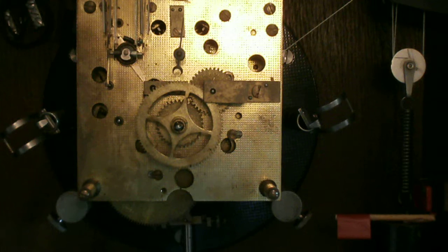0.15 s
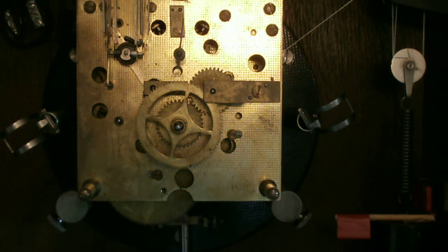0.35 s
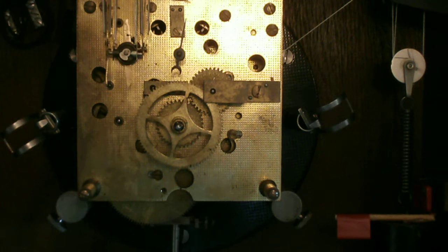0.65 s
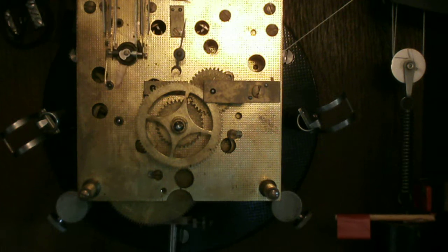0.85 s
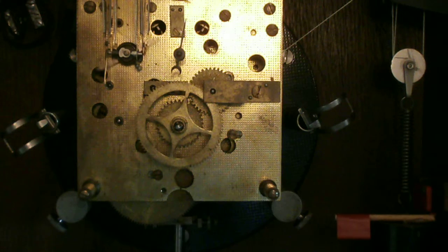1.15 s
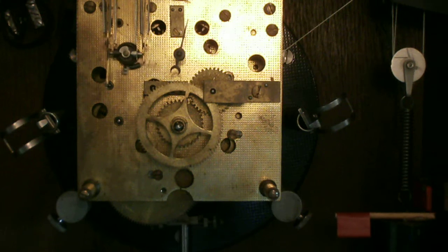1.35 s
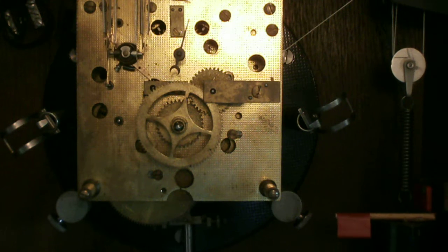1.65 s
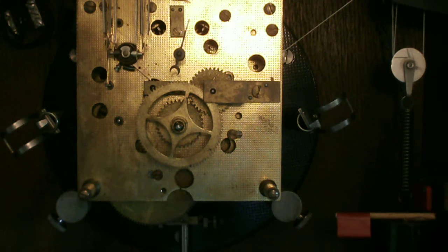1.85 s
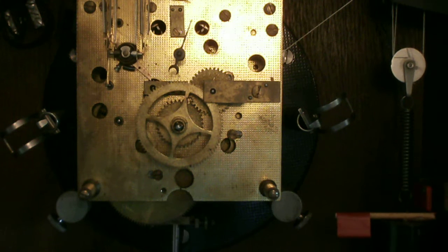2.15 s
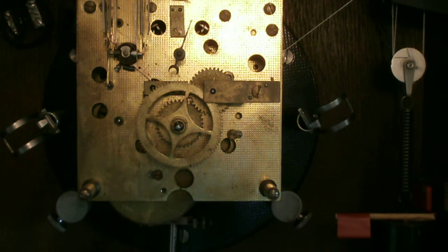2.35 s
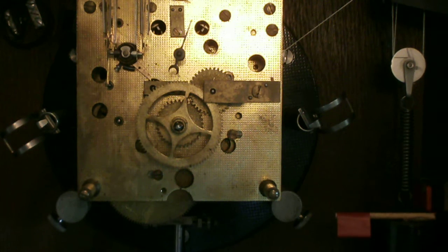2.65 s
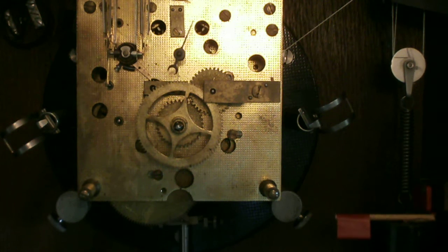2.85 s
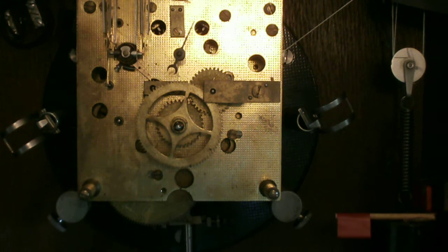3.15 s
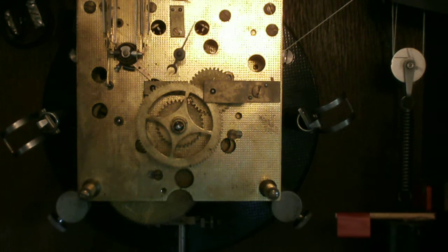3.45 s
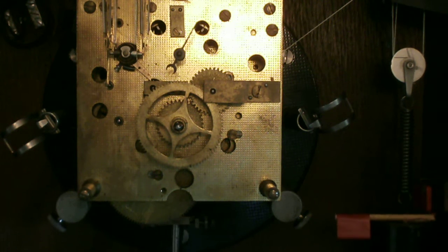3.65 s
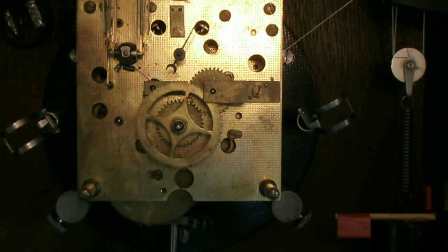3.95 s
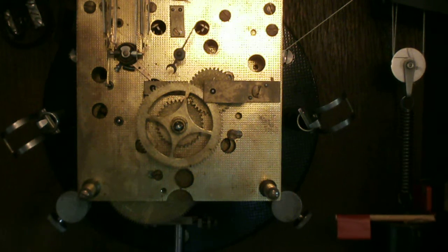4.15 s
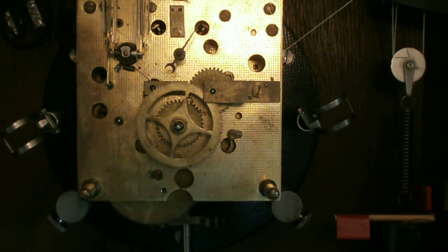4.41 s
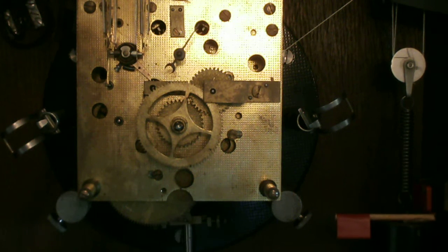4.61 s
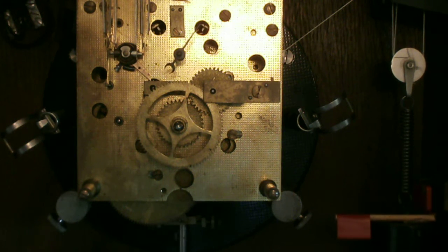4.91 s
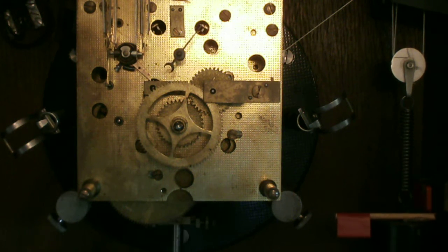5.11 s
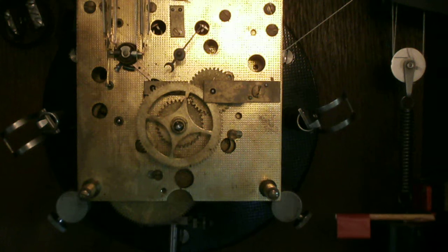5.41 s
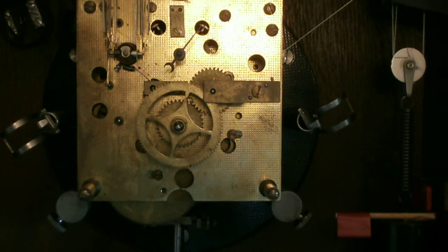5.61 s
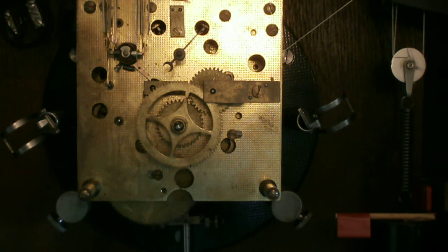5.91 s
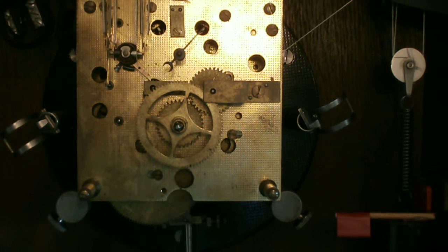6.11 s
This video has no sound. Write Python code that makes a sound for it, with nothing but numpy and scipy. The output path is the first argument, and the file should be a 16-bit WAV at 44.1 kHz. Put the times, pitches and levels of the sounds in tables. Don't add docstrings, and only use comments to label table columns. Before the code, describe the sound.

Quiet, dry pendulum clock beats alternate between a bright tick and a slightly fuller tock, with uneven gaps. At about one second a loud burst of metallic clacks and bounces breaks in, with a brief woody knock and short cabinet echo, then ends. The faint beats carry on steadily to the end. The close microphone adds soft rumble and hiss, with faint buzzy high-pitched screen noise.

```python
import sys
import numpy as np
from scipy import signal
from scipy.fft import rfft, irfft, next_fast_len
from scipy.io import wavfile
from scipy.ndimage import map_coordinates

SR = 44100
rng = np.random.default_rng(int(sys.argv[2]) if len(sys.argv) > 2 else 0)


def voltage_ratio(level):
    return 10 ** (np.asarray(level, float) / 20)


def int16_out(signal):
    q = np.round(np.clip(np.atleast_2d(signal).T, -1, 1) * 32767)
    wavfile.write(sys.argv[1], SR, q.astype(np.int16))


N = 276504


# pitch_hz, width_hz, level_db
TICK_NOTES = [(896, 170, -1), (1980, 190, -6.5), (2490, 250, -11.5), (3750, 130, -7.5), (4070, 160, -6),
              (5090, 140, -9), (5580, 170, -2.5), (6280, 80, -8), (6540, 80, -17), (7080, 110, -1),
              (8400, 86, -7), (9250, 120, -16), (10300, 150, -25)]
TOCK_NOTES = [(843, 190, -1), (1795, 44, 1.5), (1916, 65, 6.5), (3480, 105, -4), (3950, 130, -1.5),
              (4280, 130, -6), (4700, 120, -12), (5530, 89, 2.5), (5840, 71, -6), (6310, 120, -2),
              (6700, 88, -5), (2700, 390, -8), (8100, 180, -13), (9400, 180, -13)]
# pitch_hz, t60_s (time to fade by 60 dB), level_db (against the beat)
BACK_BOARD = [(963, .075, -9.5), (988, 0.084, -10)]


def escapement():
    first_tick_s, swing_s, tock_after_s = 0.5795, 1.5, 0.8151
    tick_db, tock_db, tooth_db = -30, -29, -9
    board_lag_s, board_rise_s = 0.0016, 0.0015
    out = np.zeros(N + SR)
    t = np.arange(SR // 4) / SR
    pallets = ((first_tick_s, tick_db, TICK_NOTES), (first_tick_s + tock_after_s, tock_db, TOCK_NOTES))
    for (first_s, beat_db, notes), (board_hz, t60_s, board_db) in zip(pallets, BACK_BOARD):
        voice = clack(notes, 0.0025, crack_db=-1.5, lag_s=0.002826, wet_db=-7.5)
        board = voltage_ratio(board_db - 60 * t / t60_s) * np.sin(2 * np.pi * board_hz * t)
        board = board * (1 - np.exp(-t / board_rise_s))
        for beat_s in np.arange(first_s, N / SR, swing_s):
            tooth = clack(notes, 0.0025, crack_db=8.5, lag_s=0.00195, wet_db=-7.5)
            add(out, beat_s - 0.0018, voltage_ratio(beat_db) * (voice + voltage_ratio(tooth_db) * tooth))
            add(out, beat_s + board_lag_s, voltage_ratio(beat_db) * echoes(board, wet_db=-6.5))
    return out[:N]


# start_s, peak_db, contact_s, case_knock_db
PULL_IN = [
    (1.0215, -7.5, 0.0027, -27.5),
    (1.0255, -22, 0.002, -47),
]
LEVER_FALL = [
    (1.214, -0.5, 0.0032, -12.5),
    (1.2203, -4, 0.0018, -27),
    (1.229, -29, 0.0016, -45),
    (1.252, -31, 0.0011, -32),
]
PAWL_DROP = [
    (1.3298, -4.5, 0.0025, -23),
    (1.339, -32, 0.00094, -31),
]
RELEASE = [
    (1.3533, -11, 0.0014, -19),
    (1.3572, -7.5, 0.0018, -33),
    (1.361, -13.5, 0.0023, -32.5),
    (1.3695, -26.5, 0.0012, -26),
]
SWITCHING = [
    (1.2063, -22, .001, -54),
    (1.2083, -30, 0.0011, -38),
    (1.3149, -12, 0.00091, -51),
    (1.3215, -25, 0.00056, -47),
]
SETTLING = [
    (1.4348, -24.5, 0.00068, -65),
]
# pitch_hz, width_hz, level_db
ARMATURE_NOTES = [(700, 110, -11), (1330, 150, -4), (1910, 290, -9.5), (2580, 120, -2), (3550, 86, -6),
                  (5970, 150, -0.5), (4540, 113, 3.5), (6720, 126, 2.5), (7480, 240, -2.5), (7700, 62, -12),
                  (8600, 110, -15), (9900, 140, -21), (11970, 250, -14), (14200, 110, -10)]
STOP_NOTES = [(1370, 69, -8.5), (2610, 35, -6), (3380, 100, -7), (4100, 300, -15), (5020, 830, -8),
              (5910, 300, 0.5), (5900, 174, -7.5), (6700, 210, 4.5), (6940, 56, 0), (7620, 270, -5),
              (8370, 160, -9.5), (11350, 200, -15), (12570, 108, -12), (15000, 130, -13)]
RATCHET_NOTES = [(1954, 47, 1), (2700, 370, -3), (3340, 100, -1), (3780, 69, 2.5), (4555, 120, 1),
                 (5770, 110, 0), (6314, 75, 2), (6600, 220, -4), (7750, 150, -8), (8520, 110, -11),
                 (9500, 180, -10), (11290, 330, -12), (12800, 300, -16), (14200, 98, -5)]
SPRING_NOTES = [(1400, 180, -5), (2670, 290, -1), (3220, 130, 0.5), (4220, 75, -1), (4460, 180, 2),
                (5630, 81, -4), (5970, 100, -6), (6170, 150, 5), (6600, 120, 5), (7420, 208, 1),
                (8500, 110, -4), (8900, 85, -6), (10700, 110, -23), (14000, 110, -8.5)]
BLADE_NOTES = [(2880, 226, -7), (4050, 1100, -9), (6650, 280, 0), (7440, 410, -8), (11700, 170, -1),
               (12900, 560, -12), (14100, 650, -11), (15500, 530, -17.5)]
TIP_NOTES = [(3450, 210, -11), (4150, 240, -3), (7100, 470, -2), (8300, 290, 1), (10700, 300, -4),
             (12000, 230, -7)]
# best_panel_hz, panel_loss_db (per octave away), best_plate_hz,
# plate_share_db, echo_db
MOUNTS = [
    (796, 17, 4800, -4, -10),
    (542, 7.5, 6900, -13, -9),
    (950, 11.5, 3100, -2, -7),
    (735, 30, 7500, -20, -7),
]


def relay():
    out = np.zeros(N + SR)
    armature, lever, pawl, spring = MOUNTS
    parts = (
        (PULL_IN, ARMATURE_NOTES, armature),
        (LEVER_FALL, STOP_NOTES, lever),
        (PAWL_DROP, RATCHET_NOTES, pawl),
        (RELEASE, SPRING_NOTES, spring),
        (SWITCHING, BLADE_NOTES, armature),
        (SETTLING, TIP_NOTES, lever),
    )
    for blows, notes, (*mount, echo_db) in parts:
        wood = knock(mount)
        for start_s, peak_db, contact_s, knock_db in blows:
            metal = clack(notes, contact_s, crack_db=-1.0, lag_s=0.0025, wet_db=echo_db)
            add(out, start_s - 0.001, voltage_ratio(peak_db) * metal)
            add(out, start_s + 0.002, voltage_ratio(knock_db) * echoes(wood, wet_db=-7.5))
    return out[:N]


# pitch_hz, t60_s, level_db
CASE_PANELS = [(150.7, 0.28, 3), (173, 0.18, -7), (227.5, 0.43, -9), (251.6, 0.208, -2), (300, 0.092, -8),
               (395.5, 0.12, -4.5), (530, .085, 0.5), (590, .08, -1), (729, 0.045, 2), (753, 0.045, 3),
               (863, 0.029, 8), (986, 0.043, -3.5), (1245, .059, -4), (1494, 0.042, 1)]
# pitch_hz, t60_s, level_db
BRASS_PLATES = [(1107, 0.1, 3), (2560, .08, -5), (2802, 0.095, 3), (3320, 0.066, -1.5), (4540, .16, -21),
                (4970, 0.26, -20), (7000, 0.24, -5.5)]


def knock(mount):
    best_panel_hz, panel_loss_db, best_plate_hz, plate_share_db = mount
    most_panel_loss_db, plate_loss_db = 13, 6
    t = np.arange(SR // 2) / SR
    modes = []
    for hz, t60_s, db in CASE_PANELS:
        loss_db = min(most_panel_loss_db, panel_loss_db * abs(np.log2(hz / best_panel_hz)))
        modes.append((hz, t60_s, db - loss_db))
    for hz, t60_s, db in BRASS_PLATES:
        loss_db = plate_loss_db * abs(np.log2(hz / best_plate_hz))
        modes.append((hz, t60_s, db + plate_share_db - loss_db))
    out = np.zeros(len(t))
    for hz, t60_s, db in modes:
        swell = 1 - np.exp(-t * hz / 3.0)
        out += voltage_ratio(db - 60 * t / t60_s) * np.sin(2 * np.pi * hz * t) * swell
    return out


def clack(notes, contact_s, crack_db, lag_s, wet_db):
    t = np.arange(SR // 8) / SR
    travel_s = lag_s * np.sqrt(1000 / np.transpose(notes)[0])
    delays_s = travel_s + contact_s * rng.random(len(notes))
    click = 1.0 * (t == 0)
    ring = filtered(click, resonances(notes, 1.1, delays_s))
    rough = rng.standard_normal(len(t)) * np.exp(-t / (2.0 * contact_s))
    crack = filtered(rough, resonances(notes, 3.5, 0.805 * travel_s))
    both = echoes(unit(ring), wet_db - 3.5) + voltage_ratio(crack_db) * echoes(unit(crack), wet_db)
    return both / np.max(np.abs(both))


def resonances(notes, widen, delays_s):
    def response(f):
        total = 0
        for k, (hz, width_hz, db) in enumerate(notes):
            damping = 1j * f * width_hz * widen
            mode = damping / (hz * hz - f * f + damping)
            total = total + (-1) ** k * voltage_ratio(db) * mode * np.exp(-2j * np.pi * f * delays_s[k])
        return total
    return response


# pitch_hz, t60_s
CABINET_ECHO = [(200, 0.26), (1000, 0.33), (4000, .25), (9000, 0.28), (15000, 0.2)]


def echoes(sound, wet_db):
    hz, t, grains = signal.stft(rng.standard_normal(SR // 2), SR, nperseg=256)
    fade = voltage_ratio(-60 * t / along(CABINET_ECHO, hz)[:, None])
    tail = signal.istft(grains * fade, SR, nperseg=256)[1]
    tail = tail * (1 - np.exp(-np.arange(len(tail)) / SR / 0.00067))
    wet = voltage_ratio(wet_db) * signal.fftconvolve(sound, tail / np.linalg.norm(tail))
    return wet + np.pad(sound, (0, len(wet) - len(sound)))


def coil():
    on_s, off_s, rise_s, fall_s, level_db = 1.08, 1.32, 0.015, 0.04, -48
    t = np.arange(N) / SR
    rise = 1 - np.exp(-np.clip(t - on_s, 0, None) / rise_s)
    fall = np.exp(-np.clip(t - off_s, 0, None) / fall_s)
    return voltage_ratio(level_db) * rise * fall * np.sin(2 * np.pi * 100 * t)


# pitch_hz, level_db (per Hz)
RUMBLE_COLOUR = [(11, -12), (18, -17), (27, -20), (92, -5), (193, -3.5), (304, -5), (352, -7), (451, -9),
                 (1090, -18.5), (2500, -29.5), (3250, -29.5), (5500, -120)]
HISS_COLOUR = [(710, -1.5), (1200, -3), (5320, -7), (6540, -6.5), (8000, -9), (11800, -10), (14000, -8),
               (15700, -3.5), (15800, -48), (16100, -120)]


def microphone():
    rumble_db, hiss_db = -50, -54
    lumps = voltage_ratio(0.8 * wobble(60) + 2.1 * wobble(180))
    rumble = coloured(lumps * rng.standard_normal(N), RUMBLE_COLOUR)
    hiss = coloured(rng.standard_normal(N), HISS_COLOUR)
    return voltage_ratio(rumble_db) * unit(rumble) + voltage_ratio(hiss_db) * unit(hiss)


# pitch_hz, level_db (per Hz)
SCAN_COLOUR = [(6000, -36), (6800, -11), (7500, -3.5), (8400, -7.5), (8750, -3.5), (9300, -0.5),
               (10900, -7), (11400, -13), (12500, -33), (13500, -120)]
# place (0-1), width (share of a field), depth_db
SCAN_DIPS = [(.48, .055, -7), (.73, .035, -11)]


def screen():
    field_hz, lines_a_field = 56.9405, 262.5
    whistle_db, hash_db = -58.5, -57.5
    fields = field_hz * np.arange(N) / SR
    dips_db = np.zeros(N)
    for place, width, depth_db in SCAN_DIPS:
        dips_db += depth_db * np.exp(-0.5 * ((fields % 1 - place) / width) ** 2)
    whistle = voltage_ratio(whistle_db + 2.5) * np.sin(2 * np.pi * lines_a_field * fields)
    scan_hash = voltage_ratio(hash_db) * unit(coloured(rng.standard_normal(N), SCAN_COLOUR))
    return unit(voltage_ratio(dips_db)) * (whistle + scan_hash)


def unit(x):
    return x / np.sqrt(np.mean(x ** 2) + 1e-20)


def along(points, hz):
    f, value = np.transpose(points)
    return np.interp(np.log(hz + 1), np.log(f + 1), value)


def filtered(x, response):
    size = next_fast_len(len(x) + 8192)
    spectrum = rfft(x, size) * response(np.fft.rfftfreq(size, 1 / SR))
    return irfft(spectrum, size)[:len(x)]


def coloured(x, curve):
    return filtered(x, lambda hz: voltage_ratio(along(curve, hz)))


def wobble(rate_hz):
    knots = rng.standard_normal(int(N * rate_hz / SR) + 4)
    return map_coordinates(knots, [np.arange(N) * rate_hz / SR])


def add(track, start_s, sound):
    track[round(start_s * SR):][:len(sound)] += sound


def scene():
    return (escapement() + relay() + coil() + microphone() + screen())[None]


def band_limit(x):
    return signal.sosfilt(signal.butter(12, 16810, fs=SR, output="sos"), x)


# pitch_hz, level_db
TREBLE_END = [(15650, 0), (15850, -19), (16800, -26), (17200, -90)]


def record(dry):
    ceiling, offset = 0.74, -0.0029
    soft = dry[0] / (1 + np.abs(dry[0] / ceiling) ** 4) ** (1 / 4)
    mix = coloured(soft, TREBLE_END)[None] + offset
    return band_limit(mix)


dry = scene()
out = record(dry)
int16_out(out)
```